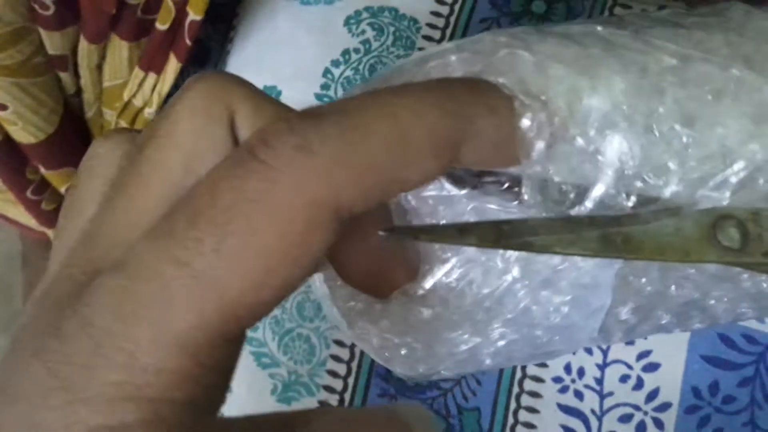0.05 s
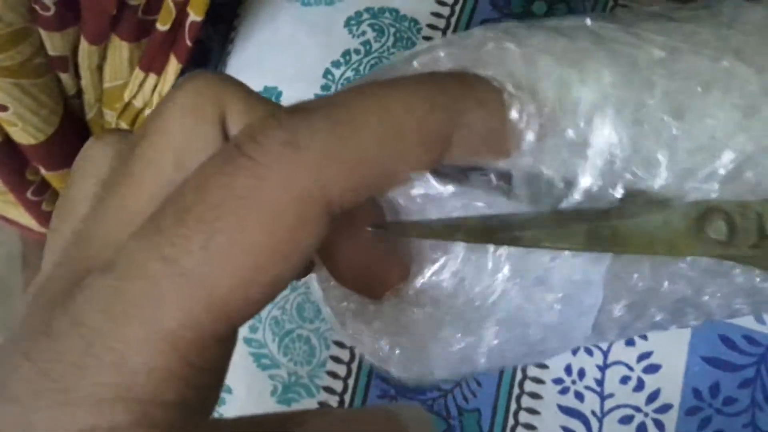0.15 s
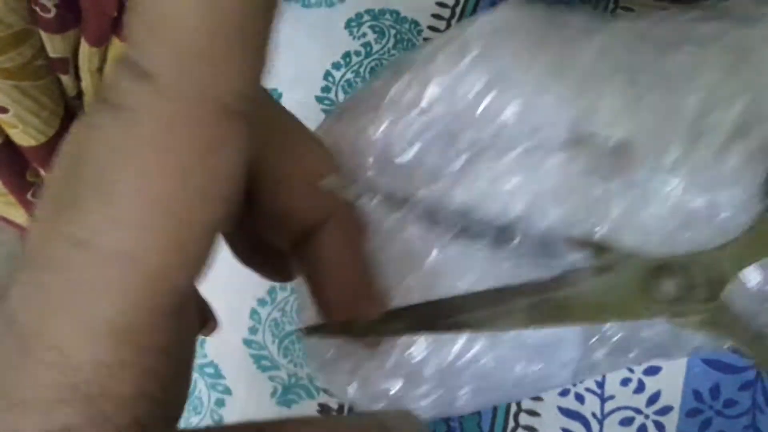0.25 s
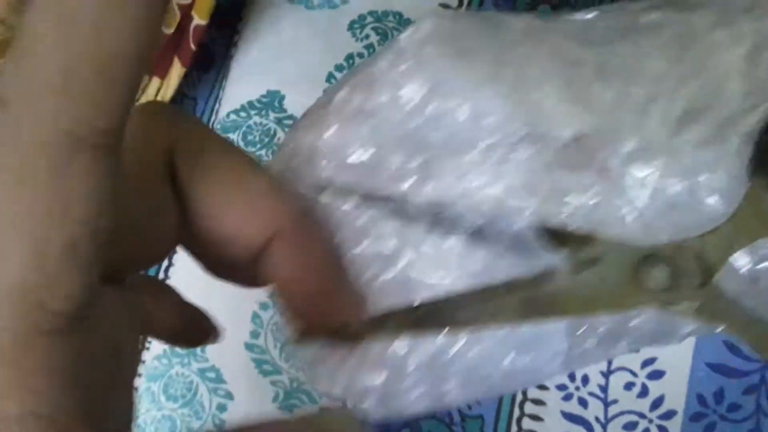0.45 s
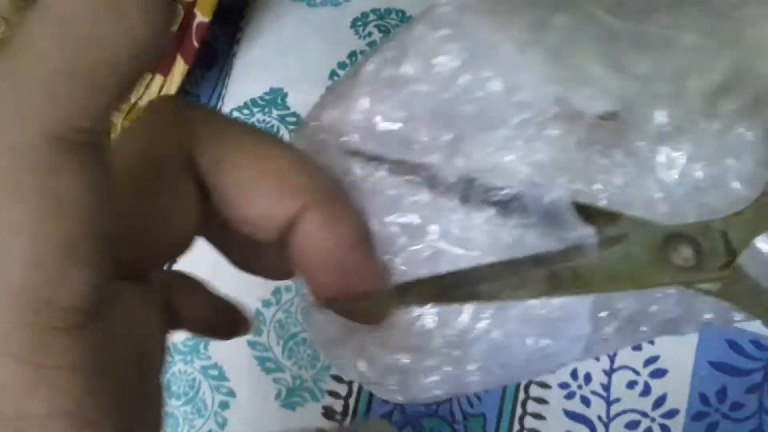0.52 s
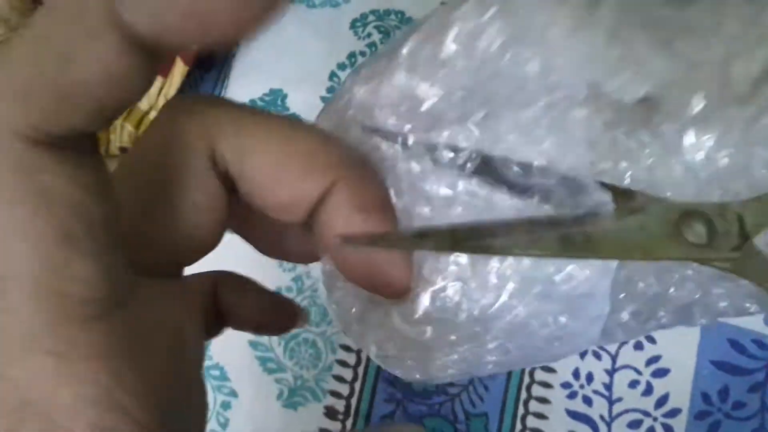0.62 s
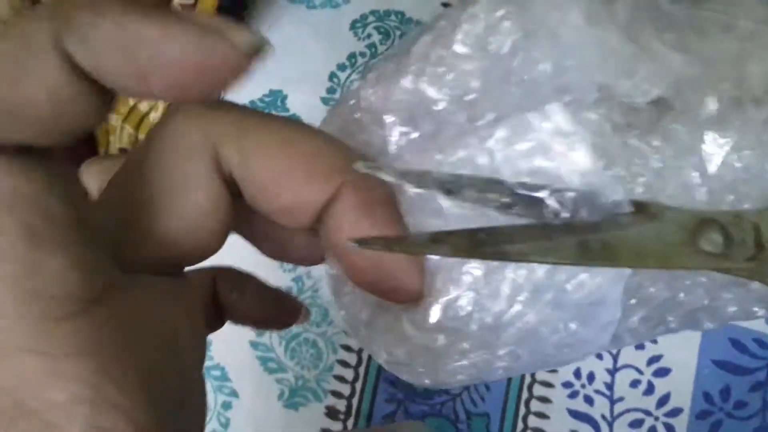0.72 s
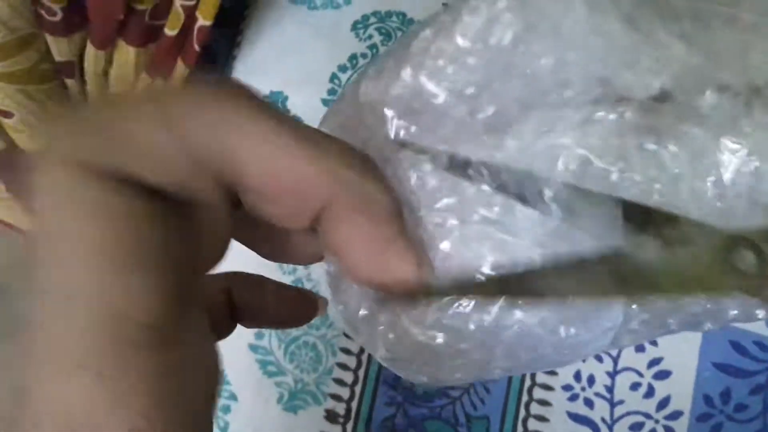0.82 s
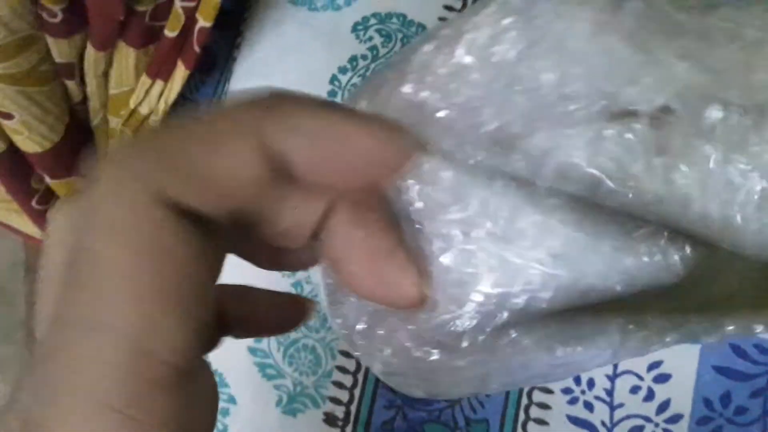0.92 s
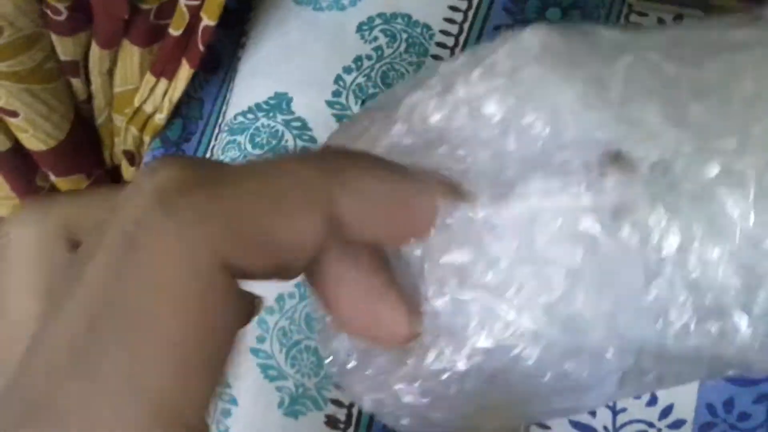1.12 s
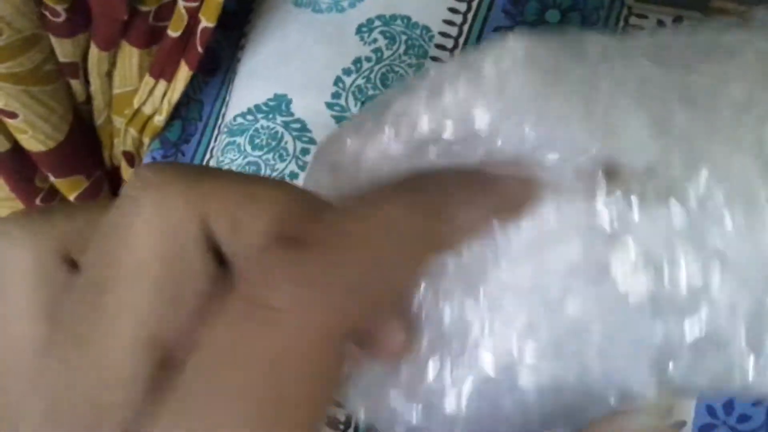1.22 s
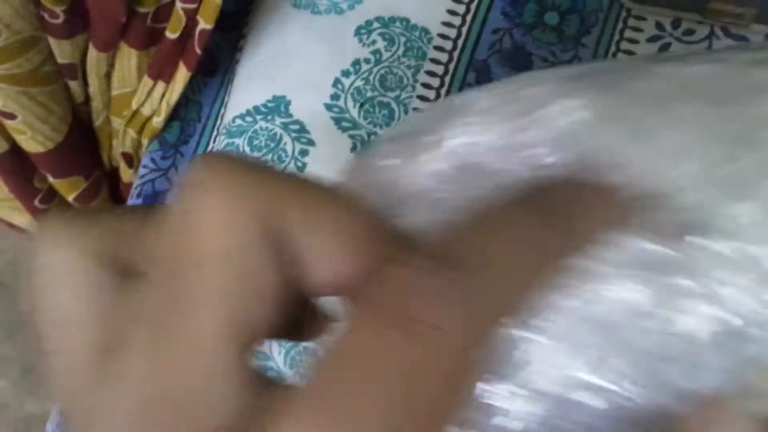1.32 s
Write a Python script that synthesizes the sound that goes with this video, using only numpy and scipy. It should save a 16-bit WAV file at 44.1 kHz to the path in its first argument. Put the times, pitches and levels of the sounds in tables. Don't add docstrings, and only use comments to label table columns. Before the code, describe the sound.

Bubble wrap bubbles bursting in two sharp clusters, with film crackle and faint groans between

```python
import sys
import numpy as np
from scipy import signal
from scipy.io import wavfile
from scipy.ndimage import uniform_filter1d

SR = 44100
rng = np.random.default_rng(int(sys.argv[2]) if len(sys.argv) > 2 else 0)


def natural_amplitude(level_db):
    exponent = np.asarray(level_db, float) / 20
    return 10 ** exponent


def master_out(mix):
    frames = np.transpose(np.atleast_2d(mix))
    ceiling = np.clip(frames, -1, 1)
    pcm = np.round(ceiling * 32767).astype(np.int16)
    wavfile.write(sys.argv[1], SR, pcm)


N = 59535

# start in seconds, peak in dB, cavity in Hz, ring in ms, snap in dB.
BUBBLE_POPS = [(.159, -40.5, 810, 1, -7), (0.2494, -31.5, 1200, 0.51, -10),
               (0.2285, -12.5, 1080, 1.16, 0.5), (0.2534, -11, 1026, 1.07, -0.5),
               (.2570, -11, 1264, 1.16, -18), (0.2599, -17.5, 950, 0.47, 9), (0.2618, -21.5, 595, 4.4, 2),
               (.2800, -25, 1070, 2.1, 20), (0.619, -37.5, 1200, 0.88, -2), (0.682, -39, 1140, 1.5, -4),
               (.7105, -35, 810, 1.17, -10), (0.777, -39.5, 1170, 0.82, -9), (0.89, -23, 1324, 1, -18),
               (0.9595, -37, 1080, 1.1, -19), (0.9692, -34.5, 1010, 1, -26), (0.9889, -34, 1310, 1.4, -8),
               (.9958, -15, 1170, 1.27, -11), (1.01, -21, 1300, 0.82, -12), (1.0119, -28, 1230, 1.6, -7),
               (1.014, -30, 1090, 0.59, -10), (1.026, -34.5, 1670, 3, 2), (1.083, -27, 1350, 0.91, -5.5),
               (1.261, -45, 2250, 3.1, -25), (1.327, -42, 1520, 1.2, -15)]
# start in seconds, peak in dB, centre in Hz, dull part in dB.
FILM_TICKS = [(0.0303, -44.5, 13500, -13), (0.1105, -48, 14500, -0.5), (0.2273, -29.5, 9260, -20),
              (0.2523, -22, 9130, 2), (0.2594, -34, 9200, -16), (0.2836, -39, 15500, -2),
              (0.3052, -42, 13100, -11), (0.319, -34, 9600, -10), (0.3538, -40.5, 9600, -2),
              (0.4351, -43.5, 11100, 6), (0.5004, -39, 8930, -4.5), (0.616, -55, 12500, -4),
              (0.6812, -35, 13600, 2.5), (0.777, -48, 12700, 3), (0.8124, -36.5, 10000, -26),
              (0.8881, -38.5, 10000, -12), (0.9293, -46.5, 9900, -1), (0.99, -46, 9890, -5),
              (0.9947, -32, 9600, -8), (1.0087, -31.5, 12200, -8), (1.013, -40, 9800, -6),
              (1.0267, -30.5, 10360, -3), (1.046, -50, 10900, -13), (1.0578, -42, 8850, -5),
              (1.0827, -42.5, 14900, -2), (1.2805, -48.5, 14200, 1)]
SHARP_TICKS_S = (.228, .253, .353, .682, .813, .995)
# time in seconds, level in dB, brightness in dB.
CRUMPLE_CURVE = [(0, -59.5, -10), (.14, -62.5, -24), (.25, -75.5, 13), (.258, -26.5, -14.5),
                 (.29, -39.5, -12), (.33, -46.5, -12.5), (.4, -55.5, -10), (.55, -65.5, -8),
                 (.7, -62, -9.5), (.86, -57, -9), (.98, -55, -10.5), (1.015, -39, -16), (1.05, -50, -9.5),
                 (1.1, -52.5, -13.5), (1.2, -62, -4.5), (1.27, -56.5, -11), (1.35, -53, -15)]
# centre in Hz, width in Hz, level in dB.
FILM_MODES = [(553, 353, -0.5), (1200, 536, 2.5), (2550, 1630, -3), (3990, 2240, -15)]
# centre in Hz, width in Hz, level in dB.
SHEEN_MODES = [(5600, 2200, -24), (9020, 1080, -2), (11770, 1900, -1.5), (14040, 2050, 0.5),
               (15500, 1860, -2.5)]
# time in seconds, slip rate in Hz, level in dB, upper mode share (0-1).
RUB_CURVE = [
    (.61, 70, -66, .8),
    (.635, 70.5, -46, .7),
    (.7, 68.5, -39, .55),
    (.74, 68, -42, .2),
    (.79, 67, -41, .05),
    (.83, 66, -56, .3),
    (.9, 70, -54, .2),
    (.932, 69, -40, .05),
    (.98, 68, -54, .2),
]
# centre in Hz, width in Hz, level in dB.
PARCEL_MODES = [(146.6, 46, 2.5), (195, 24, 1), (262, 27, -14.5), (328, 150, -15)]
# time of peak in seconds, peak in dB, pitch in Hz.
PARCEL_THUDS = [
    (.272, -36.5, 95),
    (.282, -32, 195),
    (.81, -44.5, 222),
    (.885, -40, 257.5),
    (1.04, -37, 182.6),
]
# frequency in Hz, density in dB per Hz.
ROOM_SPECTRUM = [(25, -22.5), (60, 0.5), (110, -1), (220, -2.5), (500, -13.5), (1200, -20), (3000, -38),
                 (6500, -59)]

STEADY_TOP_HZ, TOP_HZ = 15800, 16600
THUD_MS = 11.34


def band(x, hz, width_hz):
    centre_hz = min(hz, .45 * SR)
    return signal.lfilter(*signal.iirpeak(centre_hz, hz / width_hz, SR), x)


def body(x, modes):
    return sum((-1) ** k * natural_amplitude(db) * band(x, hz, width_hz)
               for k, (hz, width_hz, db) in enumerate(modes))


def cut(x, hz, order=10):
    return signal.sosfilt(signal.ellip(order, .5, 65, hz, fs=SR, output="sos"), x)


def unit(x):
    return x / np.sqrt(np.mean(x ** 2))


def curve(table, column):
    points = np.array(table)
    return np.interp(np.arange(N) / SR, points[:, 0], points[:, column])


def add(out, start_s, x, peak_db):
    i = int(start_s * SR)
    out[i:i + len(x)] += (x * natural_amplitude(peak_db) / np.abs(x).max())[:N - i]


def walk(rate_hz):
    size = int(SR / rate_hz)
    return unit(uniform_filter1d(uniform_filter1d(rng.standard_normal(N), size), size))


def ring(hz, peak_ms, size, order=3):
    t = np.arange(size) / SR
    u = t / peak_ms * 1000
    return -(u * np.exp(1 - u)) ** order * np.sin(2 * np.pi * hz * t)


def random_hits(rate_hz, spread_db):
    return (rng.random(N) < rate_hz / SR) * natural_amplitude(spread_db * rng.exponential(size=N))


def pops():
    snap_ratio, snap_ms, snap_lag_ms = 2.74, .11, .3
    out = np.zeros(N)
    for start_s, peak_db, hz, ring_ms, snap_db in BUBBLE_POPS:
        snap = ring(hz * snap_ratio, snap_ms, size=900, order=.4)
        snap = np.roll(snap, int(snap_lag_ms * SR / 1000))
        cavity = ring(hz, 0.64 * ring_ms, size=900)
        add(out, start_s, cavity + natural_amplitude(snap_db) * snap, peak_db)
    return out


def ticks():
    decay_ms = 0.58
    out, t = np.zeros(N), np.arange(400) / SR
    noises = rng.standard_normal((len(FILM_TICKS), 400))
    for (start_s, peak_db, hz, dull_db), noise in zip(FILM_TICKS, noises):
        burst = noise * np.exp(-t * 1000 / decay_ms)
        sharp = np.abs(np.array(SHARP_TICKS_S) - start_s).min() < .004
        if not sharp:
            burst = cut(burst, STEADY_TOP_HZ)
        dull = band(band(burst, 5330, 1400), 5300, 2100)
        tick = body(burst, SHEEN_MODES) + 2.2 * band(burst, hz, 1270) + natural_amplitude(dull_db) * dull
        add(out, start_s + .001, tick, peak_db)
    return out


def creases():
    rate_hz, spread_db, decay_ms = 64, 1.9, 0.96
    hits = random_hits(rate_hz, spread_db)
    env = signal.lfilter([1], [1, -np.exp(-1000 / decay_ms / SR)], hits)
    return unit(cut(band(env * rng.standard_normal(N), 3030, 2100), 5350, order=4))


def crackle():
    rate_hz, spread_db, grain_ms, crease_db = 6000, 2.5, .6, -11.5
    hits = random_hits(rate_hz, spread_db)
    power = signal.lfilter([1], [1, -np.exp(-2000 / grain_ms / SR)], hits ** 2)
    env = np.sqrt(np.abs(power / (1e-9 + uniform_filter1d(power, size=600))))
    dull = unit(body(env * rng.standard_normal(N), FILM_MODES))
    bright = unit(body(env * rng.standard_normal(N), SHEEN_MODES))
    level_db, bright_db = curve(CRUMPLE_CURVE, 1), curve(CRUMPLE_CURVE, 2)
    lone = natural_amplitude(crease_db - np.maximum(level_db + 54, 0)) * creases()
    return natural_amplitude(level_db) * (dull + lone + bright * natural_amplitude(bright_db))


def rub():
    phase = np.cumsum(curve(RUB_CURVE, 1) * (1 + 0.0096 * walk(57))) / SR
    slips = np.diff(np.floor(phase), prepend=0) * natural_amplitude(1.0 * walk(48))
    upper = np.clip(curve(RUB_CURVE, 3), 0, 1)
    modes = [natural_amplitude(db) * unit(band(band(slips, hz, width_hz), hz, 2 * width_hz))
             for hz, width_hz, db in PARCEL_MODES]
    groan = (1 - upper) * modes[0] + upper * modes[1] + modes[2] + modes[3]
    t = np.arange(N) / SR
    start_s, end_s, release_s = RUB_CURVE[0][0], RUB_CURVE[-1][0], 0.032
    gate = (t > start_s) * np.exp(-np.maximum(t - end_s, 0) / release_s)
    return groan * natural_amplitude(curve(RUB_CURVE, 2)) * gate


def thuds():
    out = np.zeros(N)
    for peak_s, peak_db, hz in PARCEL_THUDS:
        add(out, peak_s - THUD_MS / 1000, ring(hz, THUD_MS, size=5000), peak_db)
    return out


def room():
    rumble_db, hiss_db, flicker_db = -47, -68.5, 2.93
    rumble, spectrum = 0, np.array(ROOM_SPECTRUM)
    for hz in 28 * 2 ** np.arange(0, 8.1, .5):
        db = np.interp(np.log(hz), np.log(spectrum[:, 0]), spectrum[:, 1]) + flicker_db * walk(8.9)
        rumble = rumble + natural_amplitude(db) * band(band(rng.standard_normal(N), hz, hz / 2), hz, hz / 2)
    hiss = unit(body(rng.standard_normal(N), SHEEN_MODES))
    return natural_amplitude(rumble_db) * unit(rumble) + natural_amplitude(hiss_db) * hiss


def side_noise(mid, lo_hz, hi_hz, db):
    sos = signal.butter(4, (lo_hz, hi_hz), "band", fs=SR, output="sos")
    power = uniform_filter1d(signal.sosfilt(sos, mid) ** 2, size=130)
    swell = np.sqrt(np.abs(power)) ** 0.53
    return natural_amplitude(db) * swell * unit(signal.sosfilt(sos, rng.standard_normal(N)))


def near_space():
    echo_s, echo_db, tail_db, tail_ms = .0017, -20, -19.5, 14
    t = np.arange(2000) / SR
    space = natural_amplitude(tail_db) * 0.064 * rng.standard_normal(2000) * np.exp(-t * 1000 / tail_ms)
    space = cut(space, STEADY_TOP_HZ)
    space[int(echo_s * SR)] += natural_amplitude(echo_db)
    space[0] = 1
    return space


def scene():
    hits = pops() + ticks()
    hits = signal.fftconvolve(hits, near_space())[:N]
    mid = hits + cut(crackle() + rub() + thuds() + room(), STEADY_TOP_HZ)
    side = side_noise(mid, 205, 3400, -59.5) + side_noise(mid, 9050, STEADY_TOP_HZ, -40.5)
    return np.array([mid + side, mid - side]) - .0007


def top_cut(x):
    return signal.sosfilt(signal.butter(12, 16850, fs=SR, output="sos"), x)


def record(dry):
    mix = cut(dry, TOP_HZ)
    return top_cut(mix)


dry = scene()
out = record(dry)
master_out(out)
```